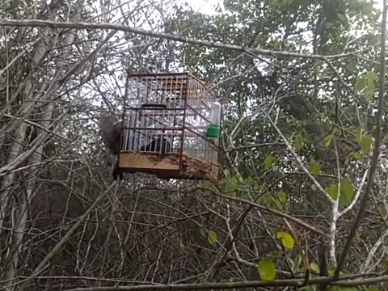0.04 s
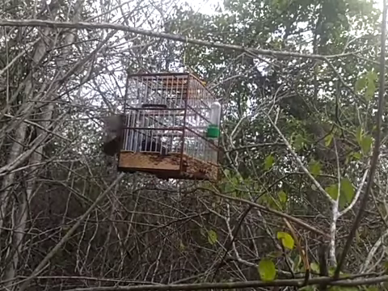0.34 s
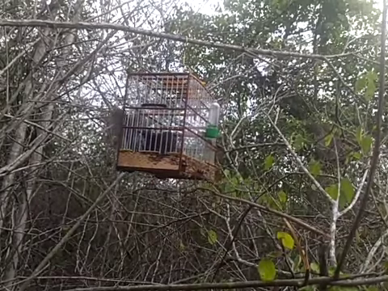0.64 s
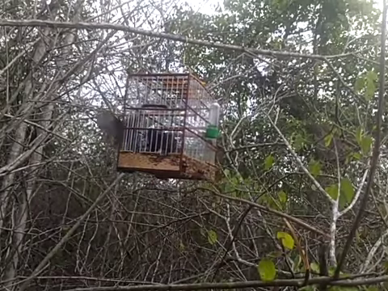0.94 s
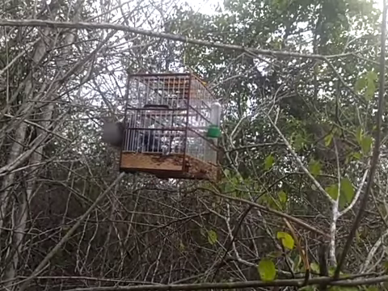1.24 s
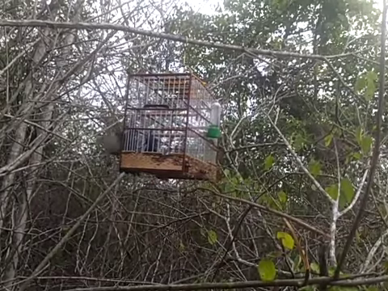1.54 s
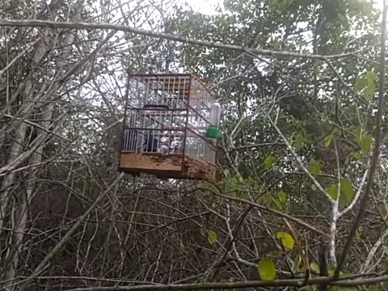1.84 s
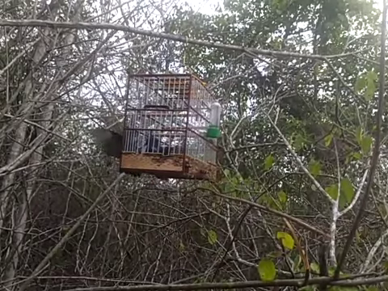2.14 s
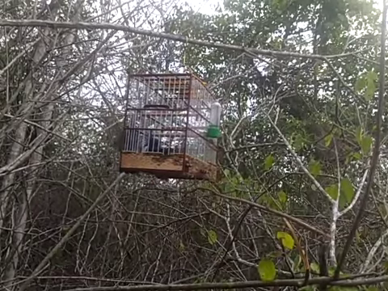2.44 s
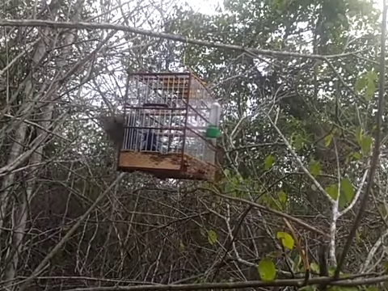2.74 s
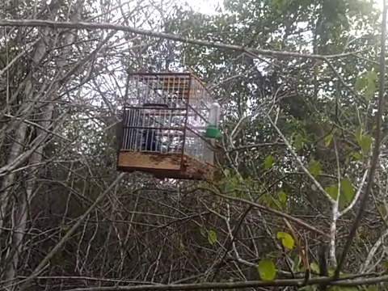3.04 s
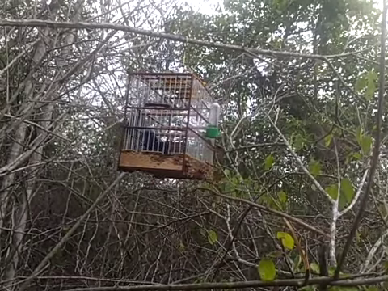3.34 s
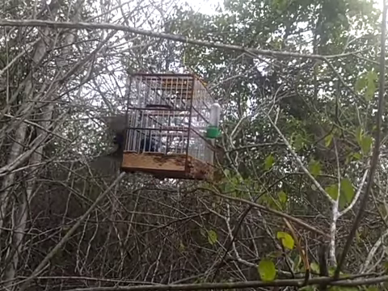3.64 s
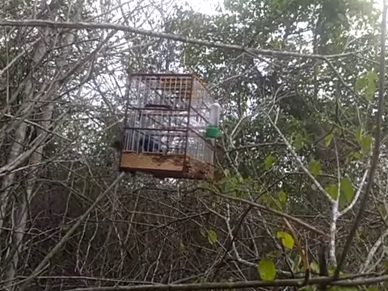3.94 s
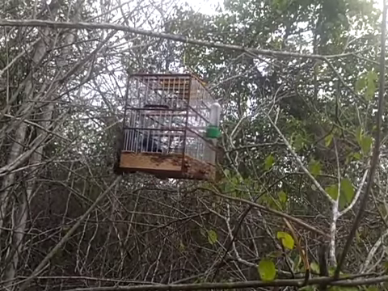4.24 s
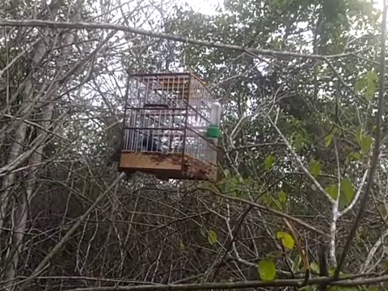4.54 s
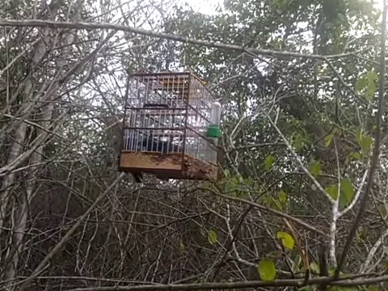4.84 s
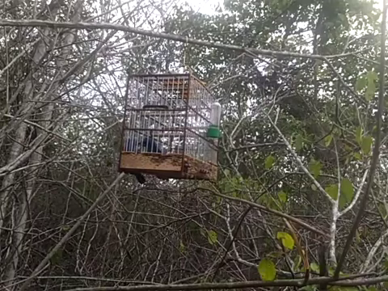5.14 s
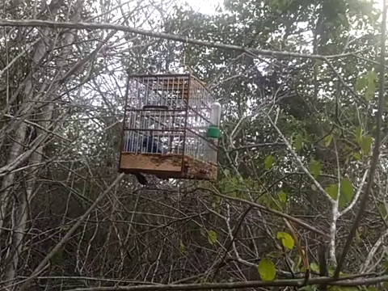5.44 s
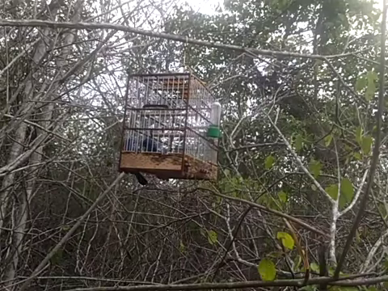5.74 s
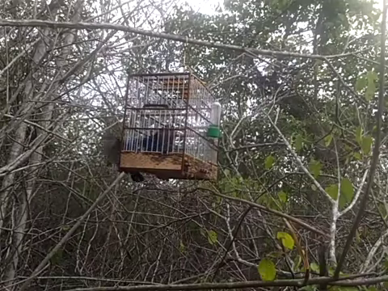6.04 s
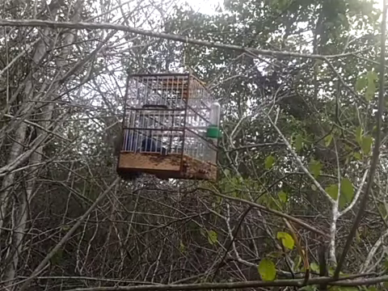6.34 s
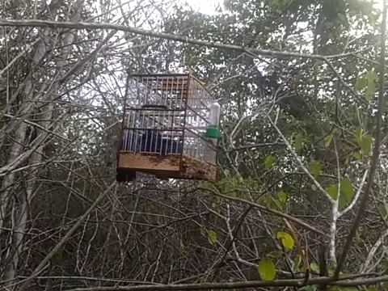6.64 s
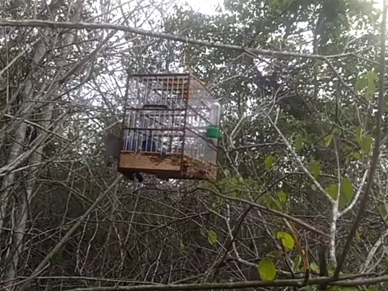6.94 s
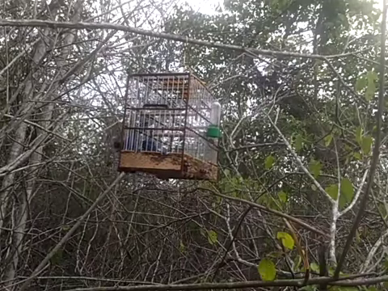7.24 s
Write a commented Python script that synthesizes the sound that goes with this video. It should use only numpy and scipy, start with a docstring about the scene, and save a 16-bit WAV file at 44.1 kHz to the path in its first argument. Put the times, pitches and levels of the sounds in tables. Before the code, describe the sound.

A small caged bird gives five short, high rising chirps and hops with light claw ticks, over soft outdoor hiss and distant engines.

```python
"""From the start, open air washes softly and far engines drone. A small songbird in a wooden cage among
trees gives two rising chirps, each a pair of notes gliding through one throat resonance. Claws tick on
perch and wires; a third chirp follows, then rustling wings, a landing thump and a fourth. The hopping
grows busy, and the fifth chirp comes before the last ticks. Throughout, two microphones a hand apart
and of opposite polarity make the bass wide and hollow."""
import sys
import numpy as np
from scipy import signal
from scipy.fft import rfft, irfft, next_fast_len
from scipy.io import wavfile
from scipy.ndimage import uniform_filter1d

SR = 44100
rng = np.random.default_rng(int(sys.argv[2]) if len(sys.argv) > 2 else 0)


def wrap_up_sound(samples):
    """Save the sound to the file named by the first command line argument, as 16-bit audio."""
    columns = np.atleast_2d(samples).T
    # keep every value between -1 and 1, then stretch to whole-number steps
    tamed = np.clip(columns, -1, 1)
    steps = np.round(tamed * 32767).astype(np.int16)
    wavfile.write(sys.argv[1], SR, steps)


N = 325017
TIME = np.arange(N) / SR

# Spectrum of the open air. Each row: frequency in Hz, relative density in dB.
AIR_SPECTRUM = [(20, -18), (35, -3), (55, 0), (100, -2), (200, -5.5), (400, -9), (900, -13), (1600, -17),
                (3000, -21), (6000, -26.5), (10000, -35), (15500, -41)]
# Likeness of the wash at the two microphones. Each row: frequency in Hz, coherence from 0 to 1.
AIR_COHERENCE = [(50, 1), (300, 0.96), (1000, 0.96), (2300, 1), (5000, 0.87), (9000, 0.67), (15000, 0.97)]
# The background wash briefly drops in level. Each row: start in seconds, end in seconds, gain in dB.
WASH_GAIN_DIPS = [(-.3, 0.152, -2.5), (2.046, 2.998, -2), (4.952, 5.555, -2)]
# Far engines. Each row: start and length in seconds, first and last pitch in Hz, left level in dB.
ENGINE_NOTES = [(0.022, 2.576, 67.2, 66.8, -43), (1.72, 0.347, 131, 139, -43),
                (1.86, 0.48, 154, 149.6, -45), (2.72, .93, 80, 91.25, -45.5),
                (2.899, 2.23, 44.5, 47.8, -48), (3.6, 0.812, 112, 100.4, -42.5),
                (4.3, 0.56, 98, 89.83, -49), (5.844, 0.58, 79, 73.1, -53.5),
                (6.601, 0.847, 74, 68.6, -47.5)]
# Chirps. Each row: start and length in seconds, first and last pitch of the low glide in Hz, its sag as
# a fraction, pitch where the high note lingers in Hz, relative level in dB, gains in dB of the high note
# and the overtones, added gains in dB of the low and the high note while hoarse, moment of the push
# as a fraction of the length.
SONG = [(0.1185, 0.0573, 2339, 5600, 0.02, 4713, -33.2, 0.5, 1, 12.5, -2, .7),
        (0.5518, 0.066, 1866, 5418, 0, 4900, -18.7, -4.2, -4, -1, -3, .73),
        (2.9334, 0.0642, 2300, 5748, 0.01, 4966, -18.2, -4.5, -4, -4.5, -9, 0.57),
        (3.8371, 0.0609, 2144, 5853, 0.03, 4662, -28.2, 2.5, 1, 2, -6, 0.73),
        (6.7158, 0.06875, 2340, 6443, .085, 4830, -20.5, -2, -4, -14, -5, 0.66)]
# Resonance of the throat. Each row: frequency in Hz, gain in dB.
THROAT_RESPONSE = [(1900, -35), (2600, -18.5), (3200, -9.3), (3700, -4.5), (4500, .8), (5050, 0.5),
                   (5550, -10), (6300, -18.5), (7000, -39)]
# Tone colour of the chirps' bright overtones and hiss. Each row: frequency in Hz, gain in dB.
OVERTONE_COLOUR = [(1500, -52), (5500, -28), (7200, -3), (9200, -6), (10300, -15.5), (11700, -8),
                   (12700, -3), (15500, -8.5)]
# Reverberation of the trees. Each row: frequency in Hz, time to decay by 60 dB (t60) in seconds.
TREE_DECAY = [(1500, 0.19), (4500, 0.364), (9000, 0.117), (15000, 0.062)]
# Claws and beak on the cage. Each row: start in seconds, relative level in dB, crack against ring in dB,
# t60 of the scratch in seconds.
CONTACTS = [(0.6517, -38.5, -13, .03), (.704, -38, -9, .025), (3.1899, -41, -3, .055),
            (3.486, -40.5, -11, .04), (3.629, -43, -7, .03), (4.518, -42.5, -2, .04),
            (4.958, -45.5, -14.5, .03), (5.3865, -47.5, -2, .04), (5.5, -32.5, -11, .033),
            (5.7153, -38, -15, .04), (5.866, -27, -3.5, .027), (6.0164, -39, -8, .05),
            (6.0249, -35, -10, .043), (6.1262, -27, -12, .055), (6.137, -29.5, -11.5, .048),
            (6.1617, -38.5, -6, .045), (6.187, -44, -6, .05), (7.018, -40.5, -8, .04),
            (7.034, -37.5, -8.5, .047), (7.3383, -35, -7, .04)]
# Modes of perch and wires. Each row: frequency in Hz, relative level in dB, t60 in seconds.
CAGE_MODES = [(3400, -.5, 0.0045), (3658, -3.5, 0.01), (4245, -0.5, 0.0065), (4885, 6, 0.004),
              (5490, -17, 0.013), (6710, -5, 0.0048), (9020, -14.5, 0.0054), (14270, -10.5, 0.0042)]
# Wings and twigs. Each row: peak time in seconds, relative level in dB, rise and fade in seconds.
WING_FLURRIES = [(3.48, -58.5, 0.215, 0.45), (4.5, -56.5, 0.18, 0.225), (5.55, -52, 0.153, .25),
                 (6.145, -48, 0.061, 0.13), (6.53, -51.5, 0.074, 0.15), (7.04, -57.5, 0.26, 0.185),
                 (7.35, -55, 0.174, 0.104)]
# Spectrum of the rustle. Each row: frequency in Hz, relative density in dB.
RUSTLE_SPECTRUM = [(1000, -26.5), (2500, -16.5), (4000, 6), (6000, -1.5), (9000, -7), (15000, -11)]

AIR_LAG_S, CAGE_LAG_S = .000427, -.000425  # positive when the sound reaches the left microphone first
SCOOP, SCOOP_S = 0.3477, 0.003858  # the low note starts flat by this fraction and settles
HOLD_FROM_HZ, HOLD_CREEP = 3500, 0.399  # near this low pitch, the high note climbs this share as fast
LOCKED_RATIO, CLOSEST_RATIO = 1.5, 1.26  # high note over low note, before and after it lingers
ATTACK_S, RELEASE_S = 0.01803, .0074
PUSH_DB, PUSH_S = 4, 0.00514  # one push of breath in each chirp


def from_db(db):
    """Converts decibels to an amplitude ratio."""
    return 10 ** (np.asarray(db) / 20)


def unit(x):
    """Normalises to rms 1."""
    return x / np.sqrt(np.mean(x ** 2) + 1e-20)


def by_hz(points, hz):
    """Interpolates a table on a log-frequency axis."""
    f, value = np.transpose(points)
    return np.interp(np.log(hz + 1), np.log(f + 1), value)


def coloured(x, points):
    """Filters by multiplying the spectrum with a gain curve given in dB."""
    size = next_fast_len(len(x), real=True)
    gain = from_db(by_hz(points, np.fft.rfftfreq(size, 1 / SR)))
    return irfft(rfft(x, size) * gain, size)[:len(x)]


def add(mix, s, sound):
    """Superposes a sound on the mix at second s."""
    part = mix[max(round(s * SR), 0):][:len(sound)]
    part += sound[:len(part)]


def wander(size, rate_hz, step=8):
    """Low-passed noise gives smooth random motion of rms 1."""
    coarse = next_fast_len(size // step + 1)
    hz = np.fft.rfftfreq(coarse, step / SR)
    slow = irfft(rfft(rng.standard_normal(coarse)) / (1 + (hz / rate_hz) ** 4))
    return unit(np.interp(np.arange(size) / step, np.arange(len(slow)), slow))


def microphones(left, right, lag_s):
    """A path difference shifts the right signal by lag_s; its microphone has opposite polarity."""
    size = next_fast_len(N, real=True)
    delay = np.exp(-2j * np.pi * np.fft.rfftfreq(size, 1 / SR) * lag_s)
    return np.array([left, -irfft(rfft(right, size) * delay, size)[:N]])


def wash(level_db=-40.5, left_db=0.2386, swell_db=0.44, dip_edge_s=0.046):
    """Partly coherent broadband noise forms the background wash; its level briefly drops three times."""
    size = next_fast_len(N, real=True)
    hz = np.fft.rfftfreq(size, 1 / SR)
    shared, own = rfft(rng.standard_normal((2, size))) * from_db(by_hz(AIR_SPECTRUM, hz))
    coherence = by_hz(AIR_COHERENCE, hz)
    left = unit(irfft(shared, size)[:N])
    right = unit(irfft(coherence * shared + np.sqrt(1 - coherence ** 2) * own, size)[:N])
    pair = microphones(left * from_db(left_db), right * from_db(-left_db), AIR_LAG_S)
    dip_db = sum(db * (np.tanh((TIME - start) / dip_edge_s) - np.tanh((TIME - end) / dip_edge_s)) / 2
                 for start, end, db in WASH_GAIN_DIPS)
    return pair * from_db(level_db + dip_db + swell_db * wander(N, 3.5))


def engines(unsteady=0.16, drift=0.0064, fade_s=0.19, right_db=2.35):
    """Only the fundamental of each far engine carries, wavering in pitch and strength on the way."""
    drone = np.zeros(N)
    for s, length, first_hz, last_hz, db in ENGINE_NOTES:
        t = np.arange(0, length, 1 / SR)
        hz = np.linspace(first_hz, last_hz, len(t)) * (1 + drift * wander(len(t), 3.6))
        fade = np.clip(np.minimum(t, length - t) / fade_s, 0, 1)
        amplitude = from_db(db) * fade * (1 + unsteady * wander(len(t), 5.9))
        add(drone, s, amplitude * np.sin(2 * np.pi * np.cumsum(hz) / SR))
    return microphones(drone, drone * from_db(right_db), AIR_LAG_S)


def membrane_phase(hz, flutter):
    """Phase is the integral of frequency, here modulated at random by a fluttering membrane."""
    fluttering_hz = hz * (1 + flutter * wander(len(hz), 1090))
    return 2 * np.pi * (np.cumsum(fluttering_hz) / SR + rng.random())


def chirp(length, start_hz, end_hz, sag, hold_hz, level_db, high_db, over_db,
          low_start_db, high_start_db, push_at):
    """Two coupled notes rise locked at 2:3, then slip to a closer ratio; their beat adds side tones."""
    t = np.arange(0, length, 1 / SR)
    progress = t / length
    glide_hz = start_hz * (end_hz / start_hz) ** progress
    bow = 1 - sag * (1 - (2 * progress - 1) ** 2)
    low_hz = glide_hz * bow * (1 - SCOOP * np.exp(-t / SCOOP_S))
    lingering_hz = hold_hz + HOLD_CREEP * (low_hz - HOLD_FROM_HZ)
    high_hz = np.clip(lingering_hz, CLOSEST_RATIO * low_hz, LOCKED_RATIO * low_hz)
    unlocked = (LOCKED_RATIO - high_hz / low_hz) / (LOCKED_RATIO - CLOSEST_RATIO)
    slack = np.clip((3400 - low_hz) / 900, 0, 1)
    flutter = 0.0116 + 0.0152 * slack  # slack membranes flutter more, so the low start is hoarse
    low, high = membrane_phase(low_hz, flutter), membrane_phase(high_hz, flutter)
    beat_hz, beat = high_hz - low_hz, high - low
    partials = [(from_db(low_start_db * slack), low_hz, low),
                (from_db(high_db + high_start_db * slack), high_hz, high),
                (from_db(over_db - 14 * unlocked), high_hz + beat_hz, high + beat + np.pi),
                (from_db(over_db + 1) * slack, high_hz + 2 * beat_hz, high + 2 * beat),
                (from_db(-24) * unlocked, low_hz - beat_hz, low - beat)]
    push_db = PUSH_DB * np.exp(-((t - push_at * length) / PUSH_S) ** 2)
    ramp = np.clip(np.minimum(t / ATTACK_S, (length - t) / RELEASE_S), 0, 1)
    breath = from_db(level_db + push_db) * np.sin(np.pi / 2 * ramp) ** 2
    voice, effort = throat(partials, breath)
    return voice + bright_overtones(voice, effort)


def throat(partials, breath, shimmer_db=1.2, roughness=0.174):
    """A resonance weights each flickering partial by its pitch; gives the voice and its envelope."""
    size = len(breath)
    tones = [(breath * gain * from_db(by_hz(THROAT_RESPONSE, hz) + shimmer_db * wander(size, 160)), phase)
             for gain, hz, phase in partials]
    voice = sum(gain * (1 + roughness * wander(size, 845)) * np.sin(phase) for gain, phase in tones)
    effort = np.sqrt(sum(gain ** 2 for gain, _ in tones)) + 1e-12
    return voice, effort


def bright_overtones(voice, effort, square_db=-28.5, cube_db=-14, hiss_db=-23):
    """Nonlinear membranes add harmonics and the breath adds hiss; both share one bright tone colour."""
    swing = voice / effort
    second = from_db(square_db) * effort ** 0.343 * swing ** 2  # persists even in soft song
    third = from_db(cube_db) * effort * swing ** 3
    hiss = from_db(hiss_db) * effort * rng.standard_normal(len(voice))
    return coloured(second + third + hiss, OVERTONE_COLOUR)


def tree_echo(x, near_db=-21.5, far_db=-31, near_t60=.08, echoes_per_s=3000):
    """Scattering from close twigs gives a quick echo, from trunks further off a longer one."""
    size = SR // 2
    taps = rng.standard_normal((2, 2, size)) * (rng.random((2, 2, size)) < echoes_per_s / SR)
    taps[..., :100] = 0  # reflections arrive after the direct sound
    near = taps[0] * from_db(-60 * np.arange(size) / SR / near_t60)
    hz, t, spectra = signal.stft(taps[1], SR, nperseg=256)
    decay = from_db(-60 * t / by_hz(TREE_DECAY, hz)[:, None])
    far = signal.istft(spectra * decay, SR, nperseg=256)[1][:, :size]
    echo = from_db(near_db) * near / np.linalg.norm(near[0])
    echo += from_db(far_db) * far / np.linalg.norm(far[0])
    return signal.fftconvolve(x[None], echo, axes=1)[:, :N]


def tick(level_db, crack_db, scratch_t60=.035, snap_db=4, snap_t60=.003):
    """A sharp snap and a brief scratch excite the damped modes of perch and wires."""
    t = np.arange(4000) / SR
    force = from_db(-60 * t / scratch_t60) + from_db(snap_db - 60 * t / snap_t60)
    contact = rng.standard_normal(len(t)) * force
    modes = np.zeros(len(t))
    for hz, db, t60 in CAGE_MODES:
        spot_hz = hz * rng.uniform(1, 1.05)  # every spot on the cage rings a little differently
        modes += from_db(db - 60 * t / t60) * np.sin(2 * np.pi * (spot_hz * t + rng.random()))
    ring = signal.fftconvolve(contact, modes)[:len(t)]
    crack = signal.sosfilt(signal.butter(2, (5000, 15000), "band", fs=SR, output="sos"), contact)
    radiation = signal.butter(2, 2200, "high", fs=SR, output="sos")  # small parts radiate no bass
    sound = signal.sosfilt(radiation, unit(ring) + from_db(crack_db) * unit(crack))
    peak_rms = np.sqrt(uniform_filter1d(sound ** 2, size=88).max())  # over the loudest 2 ms
    return from_db(level_db) * sound / peak_rms


def shuffles(per_s=1.1, level_db=-49, spread_db=2.5, crack_db=-10):
    """Faint steps fall at random times. Each row: start in seconds, relative level and crack in dB."""
    draws = rng.random((round(per_s * N / SR), 2))
    return [(when * N / SR, level_db + spread_db * (2 * force - 1), crack_db) for when, force in draws]


def rustle(grain_db=3, edge_db=-8):
    """Feathers and twigs crackle as modulated noise; overlapping flurries add in power."""
    grains = rng.standard_normal(N) * from_db(grain_db * wander(N, 174))
    power = sum(from_db(db + edge_db * np.maximum((s - TIME) / rise, (TIME - s) / fade)) ** 2
                for s, db, rise, fade in WING_FLURRIES)
    return unit(coloured(grains, RUSTLE_SPECTRUM)) * np.sqrt(power)


def landing_thump(hz=100, level_db=-33, t60=.09):
    """A landing excites one low, well damped mode of the wooden floor."""
    t = np.arange(SR // 4) / SR
    return from_db(level_db - 60 * t / t60) * np.sin(2 * np.pi * hz * t)


def scene(cage_db=4.5, far_side_db=-5.6):
    """The sources superpose; the cage, nearer the right microphone, is earlier and louder there."""
    cage = rustle()
    for s, *call in SONG:
        add(cage, s, chirp(*call))
    for s, *blow in CONTACTS + shuffles():
        add(cage, s, tick(*blow))
    add(cage, 3.625, landing_thump())
    direct = from_db(cage_db) * microphones(cage * from_db(far_side_db), cage, CAGE_LAG_S)
    return direct + tree_echo(cage) + wash() + engines()


def record(dry, edge_hz=15900):
    """A steep linear-phase low-pass filter limits the band."""
    lowpass = signal.firwin(511, edge_hz, window=("kaiser", 9), fs=SR)
    return signal.oaconvolve(dry, lowpass[None], "same")


dry = scene()
out = record(dry)
wrap_up_sound(out)
```